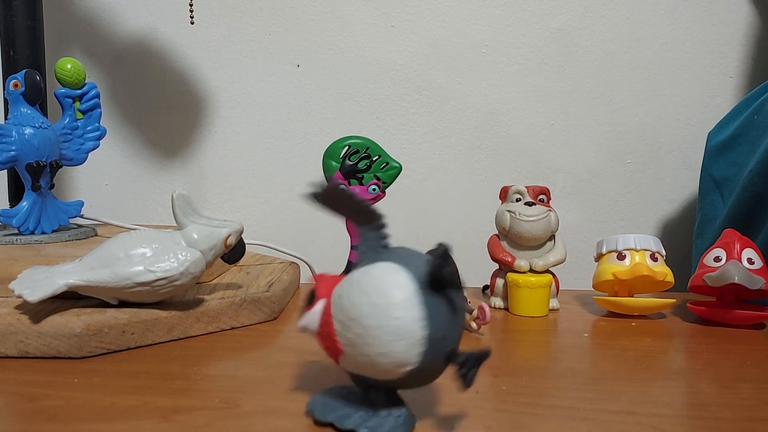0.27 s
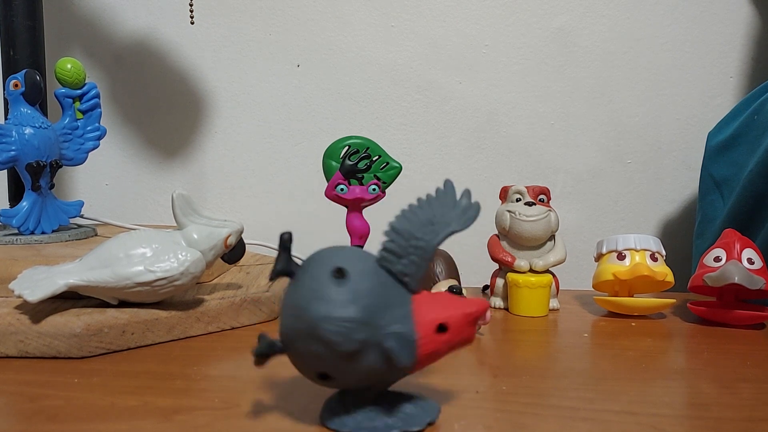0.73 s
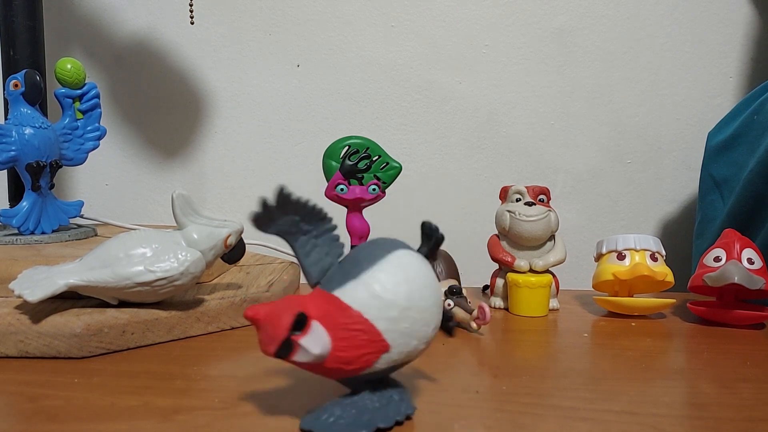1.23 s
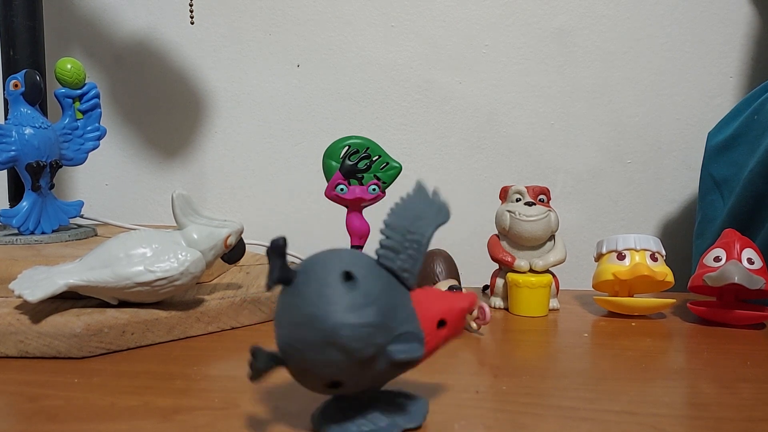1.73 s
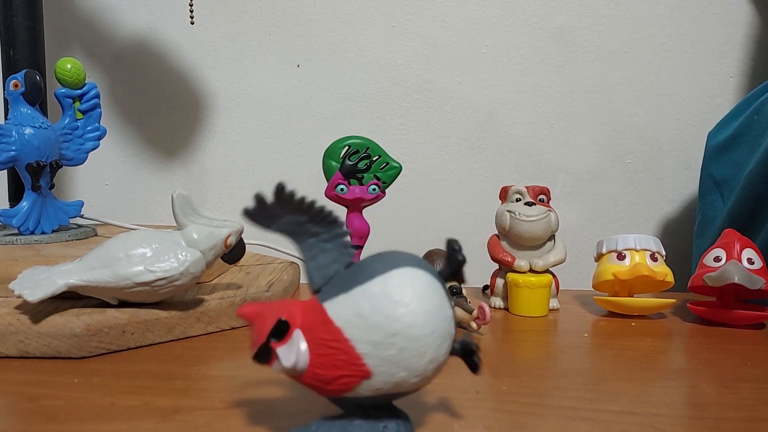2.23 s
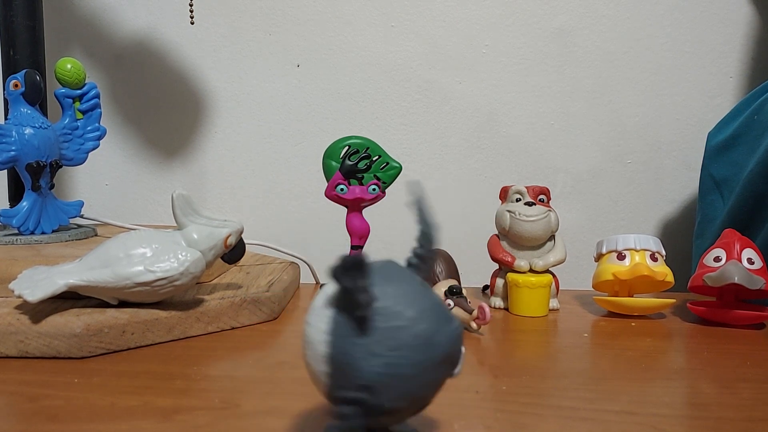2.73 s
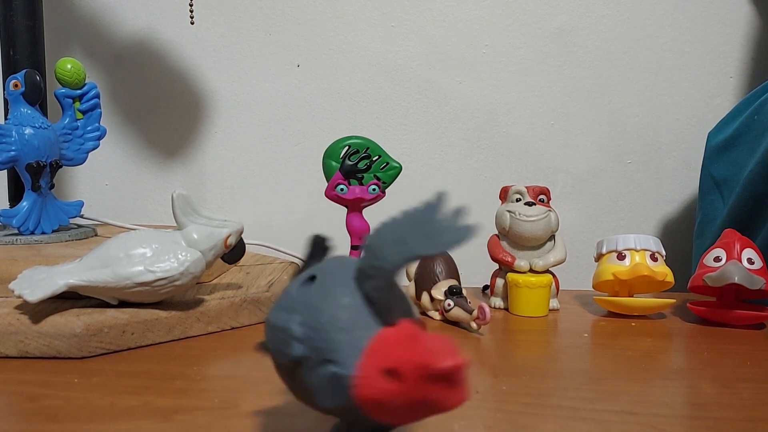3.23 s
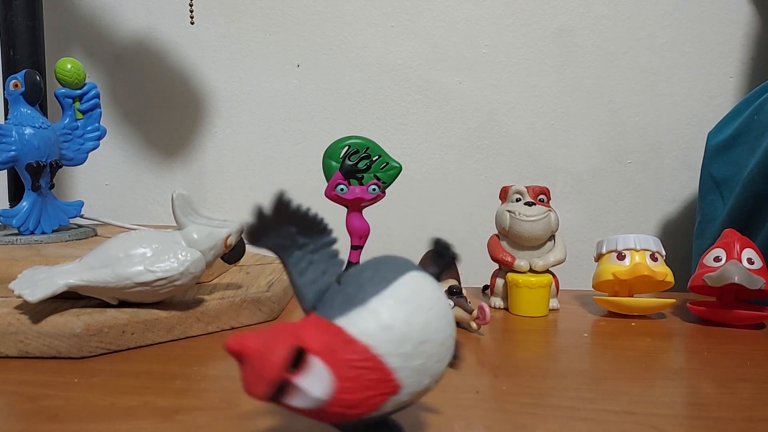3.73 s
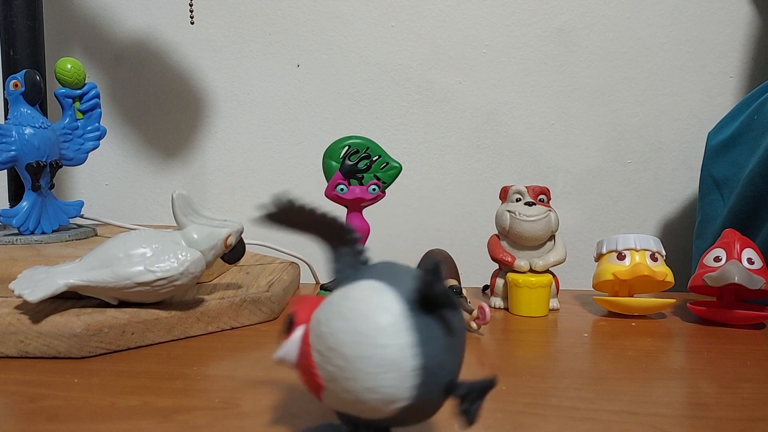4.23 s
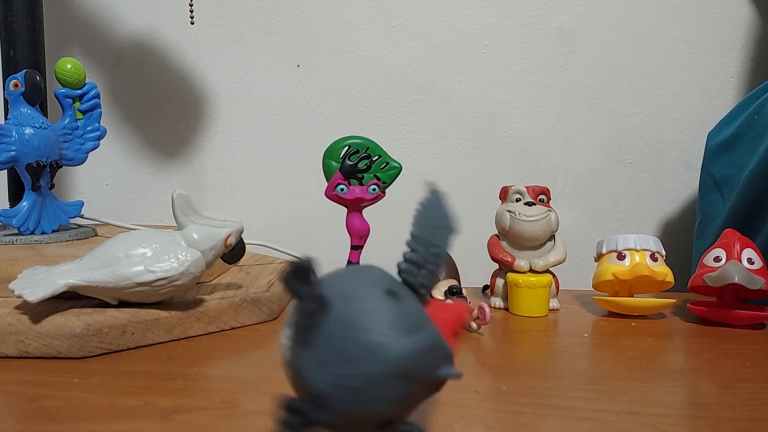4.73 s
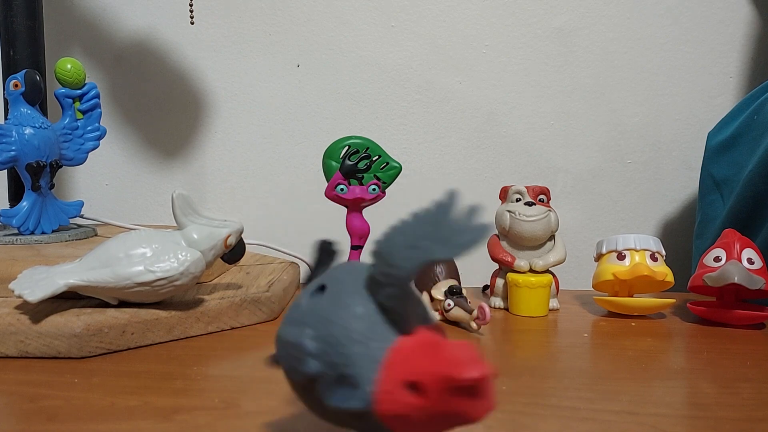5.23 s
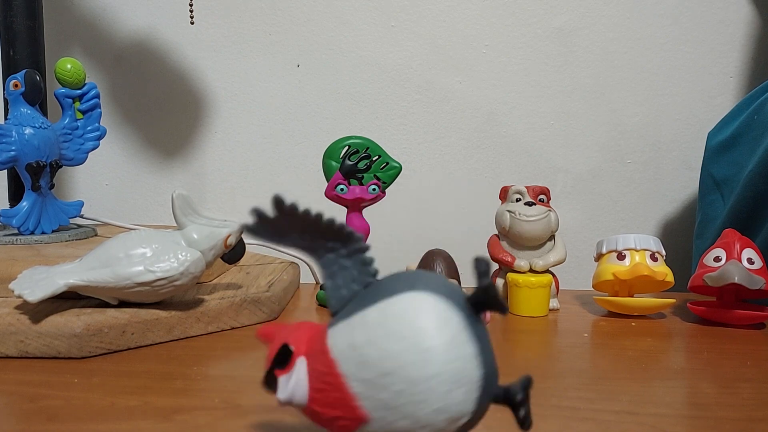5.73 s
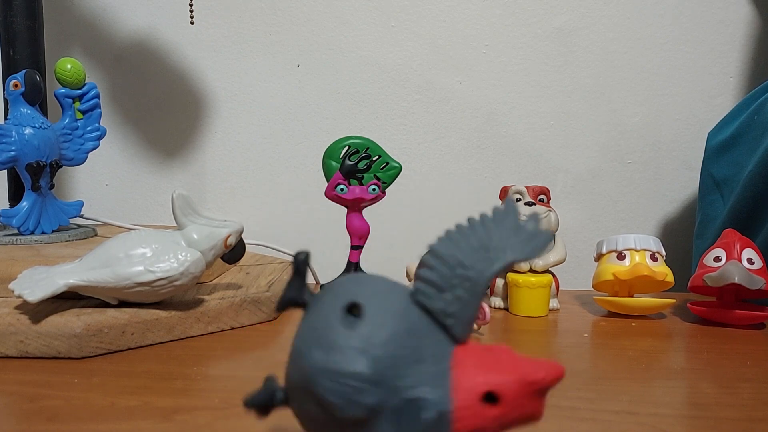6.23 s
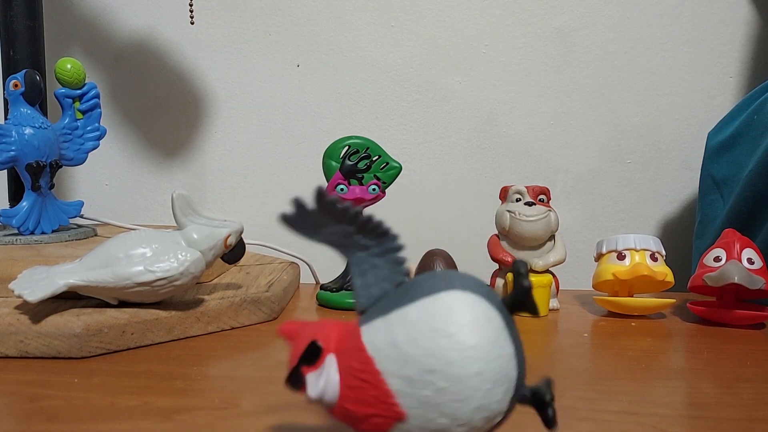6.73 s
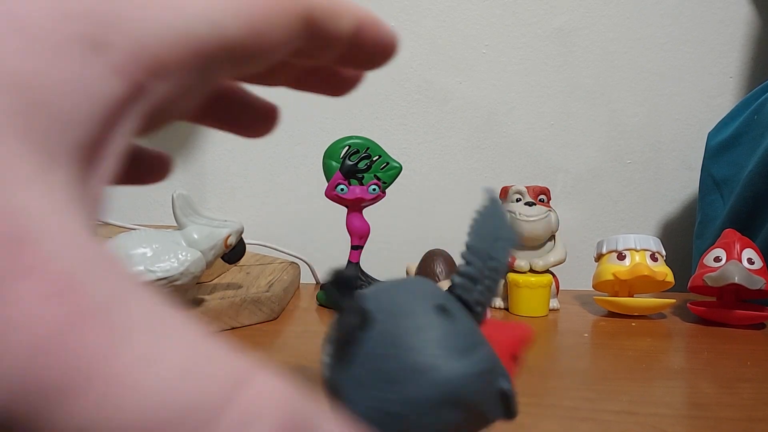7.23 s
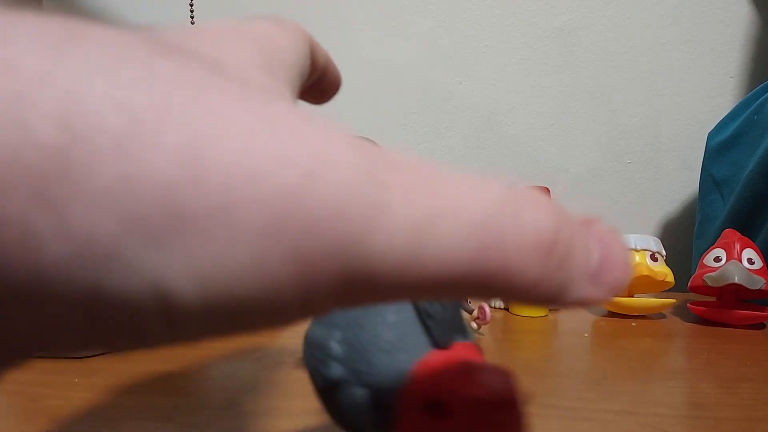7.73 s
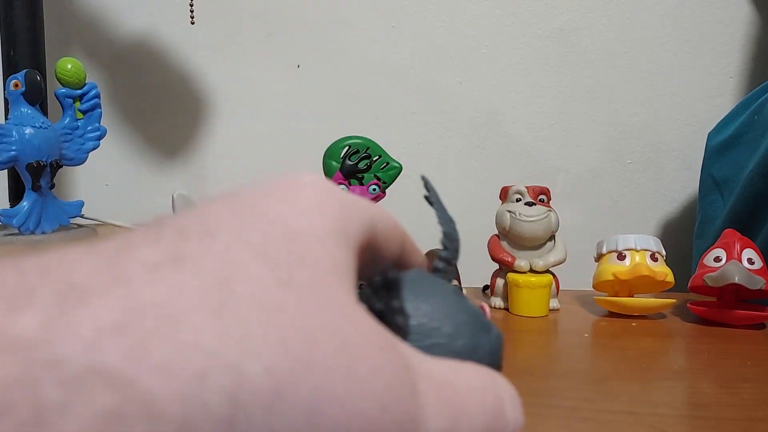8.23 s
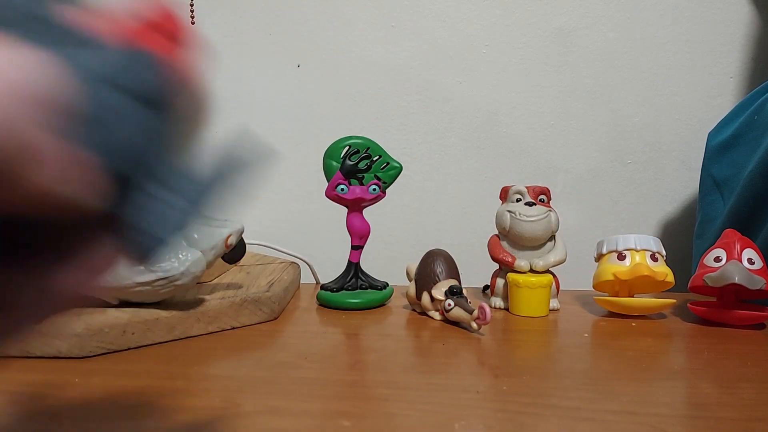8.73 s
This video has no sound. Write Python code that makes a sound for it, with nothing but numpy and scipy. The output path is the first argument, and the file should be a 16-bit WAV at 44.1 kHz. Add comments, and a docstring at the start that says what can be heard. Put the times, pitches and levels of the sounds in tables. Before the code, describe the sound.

In a small quiet room, a wind-up plastic bird whirs and clatters continuously, with tiny hitches and spurts in its fast gear noise. Its foot thuds lightly on the wooden table, and occasional hard clicks stand out. After about eight seconds fingers grab it: louder thumps and clacks, a muffled stall, then a thinner, brighter whir lifted away to the left. Close stereo microphone, soft low rumble and appliance hum.

```python
"""One hears first the dry, close clatter of a plastic clockwork bird, spinning and rocking on a wooden table.
A small two-microphone camera stands near it: gear teeth excite a ringing shell with noisy contacts, sharp knocks
ring single parts, and the foot's taps sound the low table modes. A hand catches the bird, the gears stall, then
rattle on, brighter, as it is lifted and ends up at the left. Behind lie a soft low rumble, the wavering tones of
an appliance, and air."""
import sys
import numpy as np
from scipy import signal
from scipy.fft import rfft, irfft
from scipy.io import wavfile
from scipy.ndimage import uniform_filter1d, map_coordinates

SR = 44100
rng = np.random.default_rng(int(sys.argv[2]) if len(sys.argv) > 2 else 0)


def ratio_of_db(decibels):
    """Turn decibels (scalar or array-like) into linear amplitude factors; 0 dB maps to 1."""
    return 10 ** (np.asarray(decibels, float) / 20)


def store_pcm(level_fs):
    """Save levels as 16-bit WAV."""
    pcm = np.round(np.clip(level_fs, -1, 1) * 32767).astype(np.int16)
    wavfile.write(sys.argv[1], SR, np.atleast_2d(pcm).T)


N = 395577
TIME = np.arange(N) / SR
BINS_HZ = np.arange(N // 2 + 1) * SR / N

# Appliance lines: f/Hz, level/dB, waver/dB
HUM_LINES = [(51.7, -67, 2.5), (67.8, -57, 1.8), (106.1, -65, 4), (119.2, -56.5, 0.5), (246.5, -71, 4),
             (261.6, -70.5, 4.5), (374, -79.5, 2.5)]
# Spectrum of the air in the room: f/Hz, relative density/(dB per Hz)
AIR_SPECTRUM = [(30, -19), (48, -9), (85, -7), (130, -20), (240, -1), (330, -11.5), (520, -18), (650, -30),
                (1200, -39), (4000, -60)]
# Low sound at the right microphone against the left: f/Hz, level/dB, lag/rad
BASS_AT_RIGHT = [(30, 9, 1), (60, 3.5, 1.3), (149, 4.5, 0.72), (179, -0.5, 0.93), (200, -0.5, 0.18),
                 (284, 1.5, 1.28), (584, 3, 1.13)]
# Resonances of the table top: f/Hz, width/Hz, relative level/dB
TABLE_RESONANCES = [(126, 20, 0), (157, 24, 0), (182, 22, 2), (206, 22, 1), (300, 90, -18), (470, 150, -22),
                    (900, 400, -28)]
# Foot bumps on the table: start t/s, level/dB, contact/s, favoured table pitch f/Hz
FOOT_BUMPS = [(.11, -46, 0.029, 183), (.225, -46, 0.031, 200), (.43, -44.5, 0.028, 122),
              (.59, -48.5, .09, 190), (1.315, -37.5, 0.047, 126), (1.39, -43.5, 0.057, 150),
              (1.93, -46, 0.063, 165), (2.125, -39.5, 0.088, 145), (2.235, -35.5, .036, 140),
              (2.41, -48.5, .13, 145), (2.745, -48, 0.079, 199), (2.96, -42, 0.053, 140),
              (3.18, -43.5, 0.028, 199), (3.79, -51, 0.096, 159), (4.995, -41.5, .024, 168),
              (5.115, -44, .015, 130), (5.15, -47, .047, 190), (5.355, -43, .022, 160),
              (5.43, -46, .017, 198), (5.61, -45.5, .045, 136), (5.775, -40.5, 0.078, 160),
              (5.985, -39.5, .016, 140), (6.065, -43, 0.053, 177), (6.53, -46, .017, 215),
              (6.665, -45, .02, 150), (6.74, -42, .036, 169), (7.505, -48, .028, 205),
              (7.57, -47.5, 0.036, 184), (8.118, -31.5, .028, 139), (8.165, -33.5, .016, 190),
              (8.198, -37.5, 0.031, 204), (8.561, -42.5, .034, 189)]
# Sharp knocks of plastic: t/s, peak level/dB before the overall toy level, ring f/Hz
PLASTIC_KNOCKS = [(0.146, -31, 3450), (0.51, -34, 3320), (0.649, -33, 2660), (0.999, -35, 3260),
                  (1.855, -28, 2990), (2.517, -32, 2680), (6.457, -30, 3100), (6.749, -41, 1700),
                  (7.188, -23.5, 3100), (7.199, -27, 3600), (7.866, -30, 2880), (8.003, -30, 2860),
                  (8.128, -40, 1680), (8.173, -27, 2200), (8.189, -30, 1350), (8.208, -28, 2840),
                  (8.219, -29, 4100), (8.248, -38, 1570), (8.301, -49, 1750), (8.303, -45, 9500)]
# Turns of the toy, each from where the gears face away: t/s, relative rattle level/dB over the turn
TURN_LEVELS = [(-.15, -32), (.3, -31.5), (1.04, -31.5), (1.85, -31), (2.33, -30), (2.95, -31),
               (3.63, -31.5), (4.27, -30), (4.9, -32.5), (5.62, -30.5), (6.21, -31.5), (6.6, -31),
               (7.38, -32), (7.97, -30.5)]
# The gears snag for a moment: t/s, dip/dB, length at half height/s
GEAR_SNAGS = [(.289, 12, 0.0094), (.673, 9, 0.01), (1.03, 6.5, 0.015), (1.417, 4, 0.055), (1.594, 6, 0.013),
              (1.788, 16, 0.015), (1.92, 3, 0.025), (2.15, 5, 0.019), (2.325, 8, 0.01), (2.42, 5, 0.03),
              (2.79, 10, 0.013), (2.881, 12, 0.019), (4.497, 7, 0.023), (5.095, 8.5, 0.012),
              (5.405, 12, 0.0097), (5.605, 10, 0.018), (5.737, 20, 0.013), (5.912, 6, 0.024),
              (6.39, 6.5, 0.043), (6.977, 5, 0.082), (7.77, 4, 0.027), (8.052, 11, 0.02),
              (8.274, 17, 0.025)]
# The gears spurt for a moment: t/s, rise/dB, length at half height/s
GEAR_SPURTS = [(0.549, 4, 0.021), (1.554, 4, 0.023), (1.856, 3.5, 0.024), (3.003, 3.5, 0.0089),
               (4.068, 4.5, 0.024), (5.221, 3, 0.041), (6.041, 4, 0.029), (6.453, 2.5, 0.027),
               (6.588, 4.5, 0.029), (7.999, 7, 0.016)]
# Caught and carried off: t/s, rattle gain/dB, left minus right/dB,
# bright ring of the freed shell/dB, body ring under the fingers/dB
HAND_MOVES = [(8.08, 0, .3, 0, 0), (8.12, -2, .3, 0, 0), (8.16, 2.5, 0, 0, 0), (8.25, 2.5, .3, 0, 1),
              (8.37, -6, 0, 1, 1), (8.43, -2, -.5, 1, 3), (8.52, -3, -1.3, 6, -1), (8.61, .5, -2, 7, -2),
              (8.66, -1, -1.5, 6, -4), (8.8, 1, 2.5, 3, -2), (8.85, 4, 4.5, 4.5, 2), (8.97, 3.5, 6.5, 6, 1)]
# Relative level of the shell's low register, fullest around the catch: t/s, level/dB
LOW_REGISTER = [(0, -0.5), (.4, 4), (.7, -0.5), (1, 4), (1.3, 3), (1.85, 3.5), (2.45, 3.5), (2.63, -3),
                (2.9, 5.5), (3.35, -2), (3.63, 3), (4, -4.5), (4.27, 5.5), (4.6, -3.5), (4.95, 4.5),
                (5.25, -0.5), (5.58, 4), (6.05, -5), (6.47, 3), (7, -2.5), (7.2, 0), (7.9, -1), (8.09, 2.5),
                (8.18, 8.5), (8.27, 10), (8.36, 2), (8.45, 13.5), (8.62, 7), (8.7, 1), (8.97, -2.5)]
# Broad colour of the rattle: f/Hz, relative density/(dB per Hz)
RATTLE_SPECTRUM = [(180, -50), (450, -31), (640, -29), (800, -22), (1100, -20), (1390, -14.5), (1670, -12),
                   (2350, -10.5), (2670, -7), (4000, -3.5), (5380, -2), (7150, -1.5), (7770, -8),
                   (10700, -2), (14000, -2.5), (15500, -.5)]
# Resonances added to that colour: f/Hz, width/Hz, relative level/dB
SHELL_RESONANCES = [(1697, 147, -2), (2656, 42, 3), (4250, 89, -13), (4900, 3500, -11.5)]
# Part of the direct rattle that the two channels share, least in the treble: f/Hz, share/(0 to 1)
CHANNEL_SHARE = [(400, .75), (1400, .65), (3000, .42), (6000, .36), (8000, .33), (10500, .1)]
# Balance of the toy: f/Hz, left minus right/dB
CHANNEL_BALANCE = [(500, 2.5), (1000, 1.4), (2000, 2.2), (4000, -2.4), (8000, 3.4), (12000, .5)]

AIR_DB = -60.5
RUMBLE_DB, RUMBLE_WANDER_DB = -61.5, 3.5  # soft low rumble throughout, wavering under the bumps
BUMP_ATTACK_S, BUMP_RELEASE_S = 0.014, 0.029
FAVOUR_DB_PER_OCTAVE = 24  # low table modes away from the favoured pitch answer less
TOOTH_HZ = 262.5  # central tooth rate, from which the wheel wanders
STALL_START_S, STALL_END_S = 8.27, 8.357  # the hand holds the gears still
LAST_TURN_S = 0.79  # length of the turn begun in the last row
SWING_DB, LEAN_DB = 1.3, -0.8  # louder facing the camera, swelling faster than it fades
# the body ring is fullest as the rattle sinks towards its quietest
BODY_DB, BODY_LEAN_DB, BODY_PHASE_RAD = 0.7, 1, 1.7
WANDER_DB = 0.87  # uneven running of the gears
PATCH_HZ, PATCH_S, PATCH_DB, PATCH_ALIKE = 180, .075, 2.7, .6
ROOM_T60_S, ROOM_DB = .2, -10
LATE_US, LATE_SWING_US = 114.6, 8.3  # the right microphone hears the toy later
TOY_DB = 2.0  # overall level of rattle and knocks


def curve(table):
    """Columns of a time table, sample by sample."""
    s, *columns = np.transpose(table)
    return [np.interp(TIME, s, c) for c in columns]


def along_hz(points):
    """A (f/Hz, value) table on all frequency bins."""
    hz, value = np.transpose(points)
    return np.interp(np.log(BINS_HZ + 1), np.log(hz), value)


def modes(table):
    """Summed response of damped resonances (f/Hz, width/Hz, level/dB)."""
    response = 0
    for hz, width, db in table:
        damping = 1j * BINS_HZ * width
        response = response + ratio_of_db(db) * damping / (hz ** 2 - BINS_HZ ** 2 + damping)
    return response


def shape(x, response):
    """Filter by a response given on all bins."""
    return irfft(rfft(x) * response, N)


def unit(x):
    """Scale to rms 1."""
    return x / np.sqrt(np.mean(x ** 2))


def walk(rate):
    """Random levels held 1 / rate s and slewed twice; spread near 1."""
    k = int(SR / rate)
    steps = np.repeat(rng.standard_normal(N // k + 1), k)
    return 1.4 * uniform_filter1d(uniform_filter1d(steps, k), k)[:N]


def bells(table):
    """Sum of bell shapes from rows of (t/s, height, length at half height/s)."""
    return sum(h * np.exp(-np.log(16) * ((TIME - s) / length) ** 2) for s, h, length in table)


def delay(x, seconds):
    """Read x a moving time ago."""
    return map_coordinates(x, [np.arange(N) - seconds * SR], order=5, mode="nearest")


def bass_pair(x):
    """Low sound reaches the right microphone later and, at the very bottom, stronger."""
    hz, right_db, lag_rad = np.transpose(BASS_AT_RIGHT)
    gain = ratio_of_db(along_hz(np.transpose([hz, right_db])))
    lag = np.exp(-1j * along_hz(np.transpose([hz, lag_rad])))
    return np.array([x, shape(x, gain * lag)])


def room_tone():
    """Appliance lines wavering in level and pitch over a low rush of air."""
    hum = 0
    for hz, db, waver_db in HUM_LINES:
        level = np.sqrt(2) * ratio_of_db(db + waver_db * walk(13))
        phase = 2 * np.pi * np.cumsum(hz + 1.798 * walk(11)) / SR
        hum = hum + level * np.sin(phase)
    colour = ratio_of_db(along_hz(AIR_SPECTRUM))
    same, left, right = (shape(rng.standard_normal(N), colour) for _ in range(3))
    air = bass_pair(same) + .9 * np.array([left, right])
    return bass_pair(hum) + ratio_of_db(AIR_DB) * unit(air)


def rocking():
    """The foot's rim taps ring the low table modes, each bump favouring its own pitch, over a soft rumble."""
    sparse = (rng.random(N) < 260 / SR) * rng.standard_normal(N)  # about 260 taps a second
    taps = sparse + 0.063 * rng.standard_normal(N)
    rumble = ratio_of_db(RUMBLE_DB + RUMBLE_WANDER_DB * walk(9))
    pushes = []  # power of each bump over time
    for s, _, contact_s, _ in FOOT_BUMPS:
        attack = np.clip((TIME - s) / BUMP_ATTACK_S, 0, 1) ** 2
        release = np.exp(-2 * np.clip(TIME - s - contact_s, 0, None) / BUMP_RELEASE_S)
        pushes.append(attack * release)
    _, db, _, favoured_hz = np.transpose(FOOT_BUMPS)
    out = 0
    for hz, width, mode_db in TABLE_RESONANCES:
        ring = shape(taps, modes([(hz, width, 0)]) ** 2)
        # even out the loudest taps over about 50 ms
        local_power = uniform_filter1d(ring ** 2, size=2200)
        even = ratio_of_db(mode_db) * ring / np.sqrt(local_power + 0.095 * np.mean(ring ** 2))
        away_db = FAVOUR_DB_PER_OCTAVE * np.abs(np.log2(hz / favoured_hz)) * (hz < 250)
        bump_power = ratio_of_db(2 * (db - away_db)) @ pushes
        out = out + even * np.sqrt(rumble ** 2 + bump_power)
    return out


def knocks():
    """Each knock is a short crack that rings the part of the shell it strikes."""
    out = np.zeros(N)
    t = np.arange(1500) / SR
    noise = rng.standard_normal((len(PLASTIC_KNOCKS), len(t)))
    for (s, db, hz), rough in zip(PLASTIC_KNOCKS, noise):
        push = np.exp(-t / .00008) + .4 * rough * np.exp(-t / .007)
        band = signal.butter(2, [hz / 1.6, hz * 2.1], "band", fs=SR, output="sos")
        crack = signal.sosfilt(band, push)
        ring = signal.lfilter(*signal.iirpeak(hz, 12, fs=SR), push)
        knock = crack + 2.2 * ring
        i = int(s * SR)
        out[i:i + len(t)] += ratio_of_db(db) * knock / np.abs(knock).max()
    return out


def spin():
    """Angle of the spinning toy in radians, level of each turn, and freedom to swing until the hand's hold."""
    s, db = np.transpose(TURN_LEVELS)
    angle = 2 * np.pi * np.interp(TIME, [*s, s[-1] + LAST_TURN_S], np.arange(len(s) + 1))
    turn_db = np.interp(angle, 2 * np.pi * np.arange(len(s)) + np.pi, db)
    free = np.clip((STALL_START_S - TIME) / .2, 0, 1)
    return angle, turn_db, free


def rattle_db():
    """Level of the gears: the turn's swell, snags, spurts, uneven running and the hand."""
    angle, turn_db, free = spin()
    swell_db = free * (-SWING_DB * np.cos(angle) + LEAN_DB * np.sin(2 * angle))
    moments_db = bells(GEAR_SPURTS) - bells(GEAR_SNAGS)
    return turn_db + swell_db + moments_db + WANDER_DB * walk(22) + curve(HAND_MOVES)[0]


def gear_contacts():
    """Strength of the tiny contacts: two bursts per tooth of an unevenly turning wheel, sizes scattered."""
    tooth_hz = TOOTH_HZ * (1 + .07 * walk(6) + 0.0596 * walk(120))
    phase = 2 * np.pi * np.cumsum(tooth_hz) / SR
    bursts = np.exp(.23 * np.cos(phase) + .17 * np.cos(2 * phase))
    return bursts * ratio_of_db(1.3 * walk(3000) + .7 * walk(70))


def loose_parts(contacts, ring_db=-10., flutter_db=6.):
    """Small loose parts catch the contacts and ring briefly, each at its own pitch, coming and going."""
    rings = 0
    for hz in np.geomspace(1500, 7300, num=22) * (1 + 0.034 * rng.standard_normal(22)):
        caught = contacts * ratio_of_db(flutter_db * walk(30))
        rings = rings + signal.lfilter(*signal.iirpeak(hz, 55, fs=SR), caught)
    return ratio_of_db(ring_db) * unit(rings) * np.std(contacts)


def panels(pair):
    """Small panels of the turning shell ring up and die away at random, partly alike at both microphones."""
    hz, s, spec = signal.stft(pair, SR, nperseg=1024)
    cells = rng.standard_normal((3, int(hz[-1] / PATCH_HZ) + 2, int(s[-1] / PATCH_S) + 2))
    at = np.meshgrid(hz / PATCH_HZ, s / PATCH_S, indexing="ij")
    same, left, right = (map_coordinates(c, at, order=3) for c in cells)
    own = np.array([left, right])
    patch_db = PATCH_DB * (np.sqrt(PATCH_ALIKE) * same + np.sqrt(1 - PATCH_ALIKE) * own)
    _, patched = signal.istft(spec * ratio_of_db(patch_db), SR, nperseg=1024)
    return unit(patched[:, :N])


def shell(pair):
    """Broad colour and shell resonances on a pair of spectra; registers swell with spin and hand, and flicker."""
    balance_db = along_hz(CHANNEL_BALANCE) * np.array([[.5], [-.5]])
    pair = pair * ratio_of_db(along_hz(RATTLE_SPECTRUM) + balance_db) * (1 + modes(SHELL_RESONANCES))
    angle, _, free = spin()
    lean_db = BODY_LEAN_DB * np.sin(2 * angle + 0.38)
    body_db = free * (BODY_DB * np.cos(angle + BODY_PHASE_RAD) - lean_db)
    freed_db, held_db = curve(HAND_MOVES)[2:]
    low_db = curve(LOW_REGISTER)[0]
    edges = np.geomspace(700, 13500, num=17)
    below = [0, *(1 / (1 + (BINS_HZ / hz) ** 24) for hz in edges), 1]
    out = 0
    for lower, upper, hz in zip(below, below[1:], [*edges, SR]):  # hz: top of the register
        if hz < 1500:
            register_db = low_db
        elif hz < 2400:
            register_db = held_db
        elif hz < 4600:
            register_db = body_db + held_db
        elif hz < 6600:
            register_db = freed_db
        elif hz < 7800:
            register_db = freed_db / 2
        else:
            register_db = 0
        flicker_db = 0.9 * walk(14) * min(1, 7000 / hz)
        register = irfft(pair * (upper - lower), N)
        out = out + ratio_of_db(register_db - np.mean(register_db) + flicker_db) * register
    return panels(out)


def rattle():
    """Gear contacts heard directly, and as the diffuse tail that wall and table send back."""
    same, left, right = gear_contacts() * rng.standard_normal((3, N))
    same, left, right = rfft([same + loose_parts(same), left, right])
    # the two channels share part of the rattle, least in the treble
    share = np.clip(along_hz(CHANNEL_SHARE), 0, 1)
    direct = shell(np.sqrt(share) * same + np.sqrt(1 - share) * np.array([left, right]))
    running = (TIME < STALL_START_S) | (TIME > STALL_END_S)
    gain = ratio_of_db(rattle_db()) * uniform_filter1d(1. * running, size=90)
    pan_db = curve(HAND_MOVES)[1]
    direct = direct * gain * ratio_of_db(np.array([pan_db, -pan_db]) / 2)
    # the tail's power follows the gears and dies away by 60 dB in ROOM_T60_S
    fade = np.exp(-2 * np.log(1000) / (ROOM_T60_S * SR))
    tail_power, _ = signal.lfilter([1 - fade], [1, -fade], gain ** 2, zi=[gain[0] ** 2])
    diffuse = shell(rfft(rng.standard_normal((2, N))))
    return direct, ratio_of_db(ROOM_DB) * np.sqrt(tail_power) * diffuse


def scene():
    """Toy, table and room at the two microphones."""
    direct, tail = rattle()
    late_s = (LATE_US - LATE_SWING_US * np.cos(spin()[0])) / 10 ** 6
    toy = np.array([direct[0], delay(direct[1], late_s)]) + knocks()
    return ratio_of_db(TOY_DB) * (toy + tail) + bass_pair(rocking()) + room_tone()


def top_cut(x):
    """Nothing passes above the cut-off."""
    return signal.sosfilt(signal.butter(12, 17100, fs=SR, output="sos"), x)


def record(dry):
    """The camera cuts the top off steeply, above 15740 Hz."""
    steep = signal.ellip(13, .2, 80, 15740, fs=SR, output="sos")
    cut = signal.sosfilt(steep, dry)
    return top_cut(cut)


dry = scene()
out = record(dry)
store_pcm(out)
```